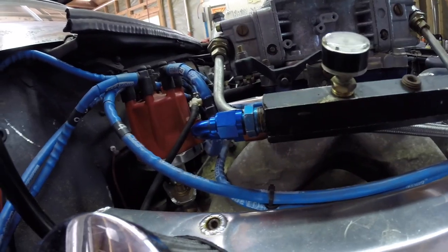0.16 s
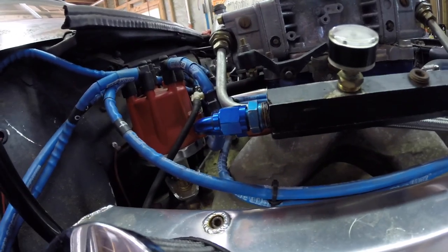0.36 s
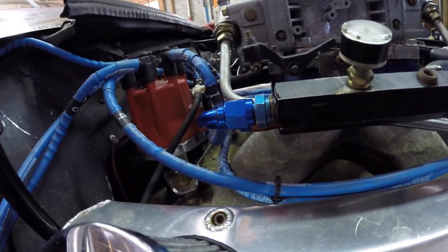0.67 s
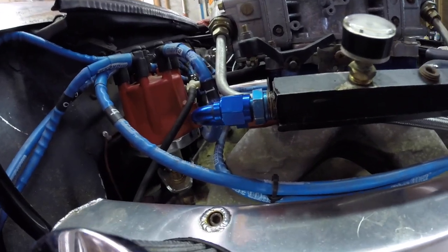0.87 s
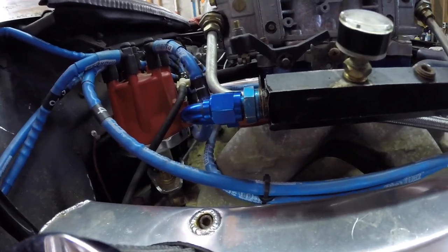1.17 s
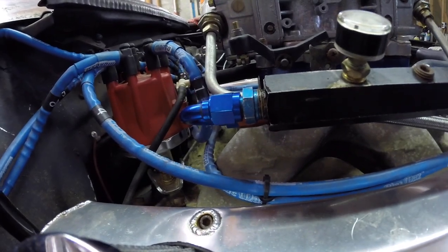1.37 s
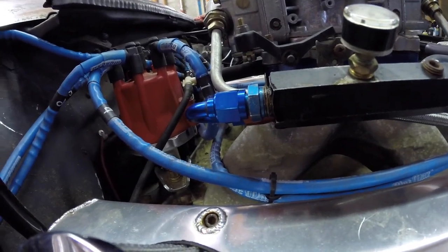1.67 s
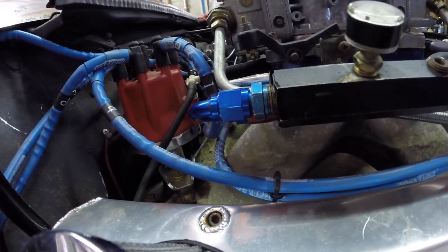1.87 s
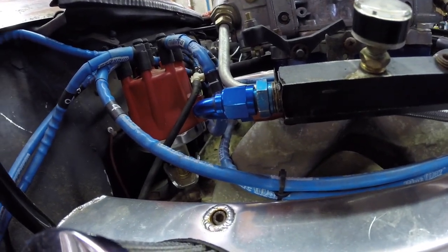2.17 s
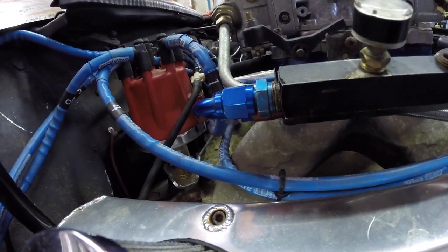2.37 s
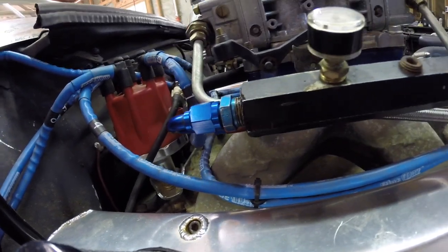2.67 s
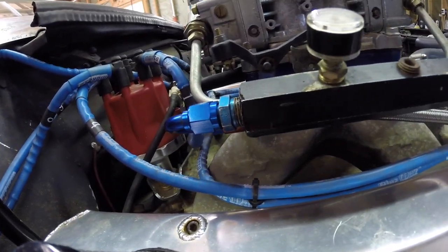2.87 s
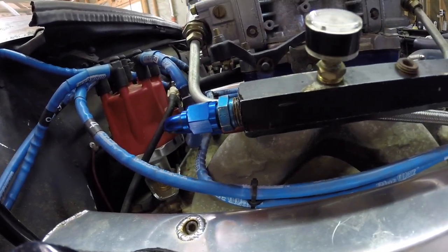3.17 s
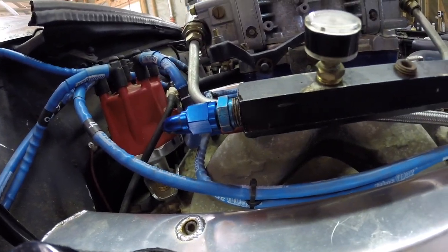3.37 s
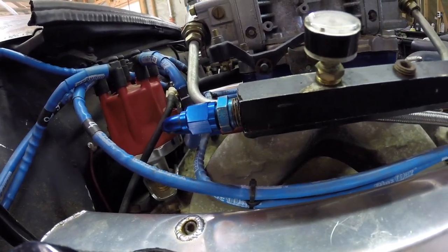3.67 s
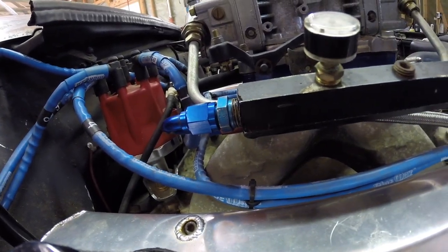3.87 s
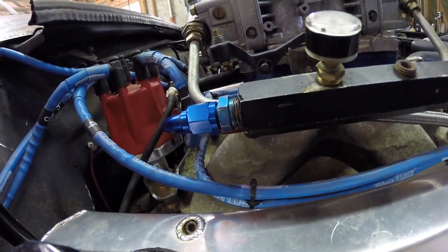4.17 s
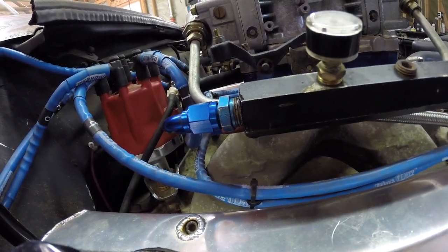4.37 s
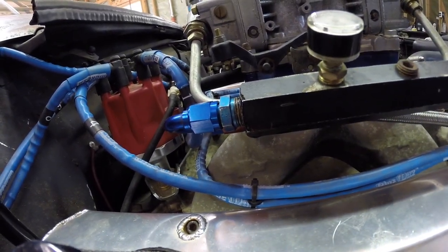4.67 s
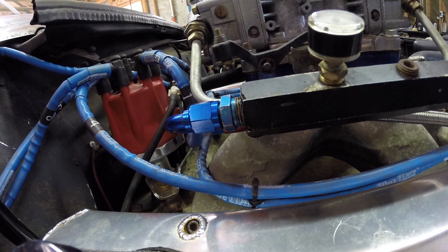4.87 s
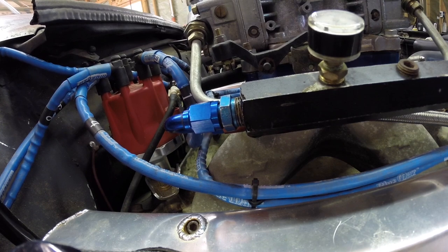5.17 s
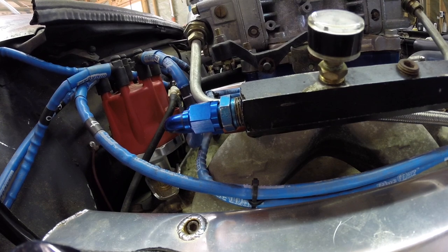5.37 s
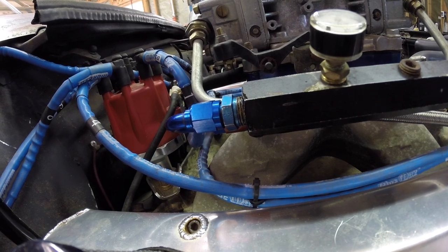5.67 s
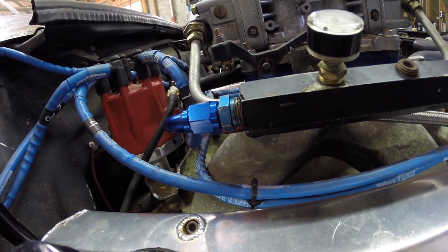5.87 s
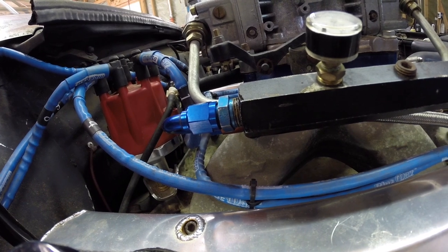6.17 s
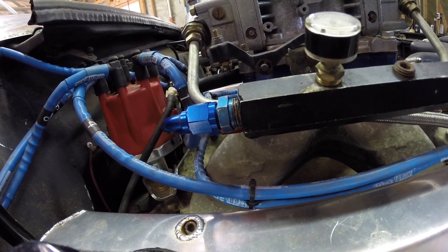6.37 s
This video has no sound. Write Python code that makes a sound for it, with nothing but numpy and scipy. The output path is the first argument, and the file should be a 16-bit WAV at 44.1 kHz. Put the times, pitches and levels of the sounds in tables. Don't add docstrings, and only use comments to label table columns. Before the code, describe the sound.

An electric fuel pump runs without a break, close to a hand-held microphone in a garage. Its steady, raspy mid-low buzz carries a thin high whine, very fast light metallic ticking and a fizzing hiss of fuel. The sound is slightly brighter at the start as the microphone leans in, then settles, its tint shifting around 2.5 seconds. A distant machine and fan drone faintly underneath.

```python
import sys
import numpy as np
from scipy import signal
from scipy.fft import rfft, irfft
from scipy.io import wavfile
from scipy.ndimage import uniform_filter1d, map_coordinates

SR = 44100
rng = np.random.default_rng(int(sys.argv[2]) if len(sys.argv) > 2 else 0)


def dump(signal):
    limited = np.clip(np.atleast_2d(signal).T, -1, 1)
    pcm = np.round(limited * 32767).astype(np.int16)
    wavfile.write(sys.argv[1], SR, pcm)


def gain_from_db(level_db):
    decades = np.asarray(level_db, float) / 20
    return 10 ** decades


N = 287532
STEP = 2048

# (time [s], speed above base [rpm])
PUMP_SPEED = [
    (0, 5.9),
    (.8, 6.1),
    (1.1, 4.2),
    (2.55, 3.9),
    (3.1, 9.2),
    (3.65, 3.6),
    (4.0, 7.9),
    (5.3, 6.8),
    (6.52, 8.5),
]
BASE_RPM = 2450
# (time [s], way from first to second place [0-1], leaning in [0-1])
CAMERA_PATH = [
    (0, 0, 1),
    (.25, 0, 1),
    (1.1, 0, 0),
    (2.45, 0, 0),
    (2.8, 1, 0),
    (6.52, 1, 0),
]

# (shaft order [per turn], level [dB])
HOSE_ORDERS = [(3, -54.5), (4, -42), (5, -55), (6, -60), (7, -42), (8, -42), (9, -49.5), (10, -51.5),
               (11, -45), (12, -47), (13, -60.5), (14, -66.5), (15, -51.5)]
# (shaft order [per turn], level at first place [dB], level at second place [dB])
PANEL_ORDERS = [(16, -63, -62), (17, -60, -61), (18, -60, -62), (19, -66, -63), (20, -59, -58),
                (21, -67, -62), (22, -59, -58), (23, -55, -55), (24, -53, -51), (25, -63, -66),
                (26, -60, -59), (27, -80, -68), (28, -54, -55), (29, -50, -51), (30, -60, -59),
                (31, -55, -57), (32, -47, -49), (34, -54, -53), (35, -58, -59), (36, -60, -59),
                (37, -64, -64), (38, -66, -66), (39, -66, -63), (40, -67, -68)]
# (shaft order [per turn], level at first place [dB], level at second place [dB])
WHINE_ORDERS = [(50, -67, -65), (51, -71, -68), (54, -65, -64), (56, -67, -66), (62, -65, -64),
                (65, -68, -65), (66, -72, -69), (73, -68, -71), (75, -75, -63), (78, -62, -65),
                (80, -69, -73), (81, -64, -71), (82, -68, -68), (85, -66, -64), (94, -69, -73),
                (95, -65, -64), (96, -64, -64), (102, -69, -70), (103, -66, -67), (109, -65, -63),
                (111, -64, -66), (113, -65, -65), (120, -71, -68), (122, -69, -71), (124, -67, -67),
                (137, -68, -80), (141, -73, -83), (168, -78, -70), (170, -83, -74), (198, -74, -74)]
# (frequency [Hz], level [dB])
WEAK_ORDERS = [(1600, -70.5), (3000, -74), (4500, -72), (5500, -76.5), (7000, -79.5), (9000, -86)]
# (frequency [Hz], half width [Hz])
BODY = [(214.5, 13), (268, -6), (364, 6), (455, -91), (507, 74), (547.5, 6), (793, 110), (934, -13.5),
        (967, 14), (981, 7), (1108, 12), (1282, 45), (1291, 7), (1393, 6)]
BUZZ_DB, WHINE_DB = .22, 1.2
PULSE_LAG, PULSE_SLOPE = .359, .285
LOBES, LOBE_SCATTER = 4, .6

# (place in turn [0-1], level [dB], scatter [dB], ring [Hz], ring width [Hz])
TAPS = [
    (0, -47, 1.2, 9620, 570),
    (.756, -49.5, 3.5, 9700, 630),
    (0.99, -62.5, 6, 9500, 550),
    (1, -59, 6, 10200, 500),
    (.06, -56, 3.5, 8090, 230),
    (.8, -56, 3, 8090, 370),
    (.755, -66, 4, 9500, 300),
    (0, -59.5, 2, 11700, 430),
    (.77, -63, 4, 13600, 400),
]
# (frequency [Hz], width [Hz], level at first place [dB], level at second place [dB])
RINGS = [(3330, 270, -62, -61.5), (3860, 220, -65.5, -64), (4506, 560, -59.5, -61.5), (5140, 52, -73, -70),
         (6300, 74, -66, -67), (7260, 100, -70, -76), (8720, 170, -71.5, -69), (10200, 240, -68, -80),
         (10760, 170, -70, -76), (11730, 360, -75, -73), (12200, 150, -81, -81), (14850, 350, -75, -76)]
# (frequency [Hz], width [Hz], level leaning in [dB], at first place [dB], at second place [dB])
MOVING_RINGS = [(5690, 460, -51, -59, -62), (6860, 160, -66, -65, -59.5), (8110, 120, -63, -59.5, -64.5),
                (9640, 430, -62.5, -64, -63.5), (13600, 300, -64, -68, -69)]
RING_SWAY_DB, RING_SWAY_HZ = .8, 1.2
# (frequency [Hz], density [dB per Hz])
HISS = [(15, -43), (25, -12), (91, -15.5), (159, -10.5), (232, -13), (312, -8.5), (479, -9.5), (548, -17.5),
        (610, -9.5), (756, -18.5), (1330, -16.5), (1690, -21), (8710, -28), (9690, -29.5), (15300, -39)]
HISS_DB = -47
# (frequency [Hz], width [Hz], depth [0-1])
GAPS = [(228, 32, 0.04), (352, 41, 0.24), (750, 44, 0), (1400, 38, 0.6), (2410, 210, 0.7), (3560, 160, 0.4),
        (5200, 160, 0.46), (5900, 80, 0.3), (7740, 150, 0.6), (8400, 180, 0.6), (9080, 170, .6),
        (11250, 200, 0.3), (12700, 500, 0.4), (14500, 300, .2)]

# (shaft order [per turn], level [dB])
DRONE_ORDERS = [(2, -55), (5, -58.5), (6, -61), (7, -65.5), (8, -70), (10, -72.5)]
HUNT_HZ, HUNT_DEPTH_HZ, HUNT_PERIOD_S, HUNT_TOP_S = 27.9, .42, 5.0, .9
THIRD_DB, THIRD_FADE_DB_PER_S = -55.5, -1.3
STANDING_HZ, STANDING_WIDTH_HZ, STANDING_DB = 82.4, .45, 8.0
# (shaft order [per turn], level [dB])
FAN_ORDERS = [(5, -66.5), (9, -70), (14, -63), (20, -66.5)]
BELT_RATIO, SLIP_HZ, SLIP_PERIOD_S, SLIP_TOP_S = .48, .11, 1.9, 1.05
FAN_BLADES, BLADE_DB = 10, -54.5
BEAT_DB, BEAT_PERIOD_S, BEAT_TOP_S = 3.5, 1.18, 1.33


def curve(rows):
    s, *columns = np.transpose(rows)
    return [np.interp(np.arange(N) / SR, s, column) for column in columns]


def read(points, hz):
    f, value = np.transpose(points)
    return np.interp(np.log(hz + 1), np.log(f + 1), value)


def evened(x):
    return x / np.sqrt(np.mean(x ** 2) + 1e-20)


def between(first, second, place):
    return np.outer(first, 1 - place) + np.outer(second, place)


def drift(count, hz):
    size = N // STEP + 2
    z = rfft(rng.standard_normal((count, size)), axis=1)
    f = np.arange(z.shape[1]) * SR / N
    return evened(irfft(z / (1 + (f / hz) ** 2), size, axis=1))


def smooth(row):
    return np.interp(np.arange(N) / STEP, np.arange(len(row)), row)


def swing(period_s, top_s):
    return np.cos(2 * np.pi * (np.arange(N) / SR - top_s) / period_s)


def pant(turns, depth, crest):
    return 1 + depth * np.cos(2 * np.pi * (turns - crest))


def tones(turns, orders, level_db, lag, waver_db, waver_hz):
    swell = gain_from_db(level_db + waver_db * drift(len(orders), waver_hz))
    z = np.zeros((4097, swell.shape[1]), complex)
    z[np.round(orders).astype(int)] = swell * np.exp(2j * np.pi * lag)[:, None]
    waves = irfft(z, axis=0) * 4096 * np.sqrt(2)
    waves = np.vstack([waves, waves[:1]])
    return map_coordinates(waves, [turns % 1 * 8192, np.arange(N) / STEP], order=1)


def bay(x, place, t60, wet_db):
    t = np.arange(4096) / SR
    tails = rng.standard_normal((3, 4096)) * gain_from_db(-60 * t / t60) * (t > .001)
    tails *= gain_from_db(wet_db) / np.linalg.norm(tails, axis=1, keepdims=True)
    first, second, drifting = signal.fftconvolve(x[None], tails, axes=1)[:, :N]
    sway = .5 * smooth(drift(count=1, hz=.26)[0])
    steady = np.cos(place * np.pi / 2) * first + np.sin(place * np.pi / 2) * second
    return x + np.cos(sway) * steady + np.sin(sway) * drifting


def buzz(turns, place):
    place = np.interp(np.arange(N // STEP + 2) * STEP, np.arange(N), place)
    hoses = [(order, db, db) for order, db in HOSE_ORDERS]
    k, first_db, second_db = np.transpose(hoses + PANEL_ORDERS)
    k = np.round(k)
    body_lag = sum(np.arctan((k * 40.94 - hz) / w) for hz, w in BODY) / (2 * np.pi)
    lag = PULSE_LAG + PULSE_SLOPE * k - body_lag
    low_db = BUZZ_DB + between(first_db, second_db, place)
    low = tones(turns, k, low_db, lag, waver_db=.3, waver_hz=.7)

    k = np.arange(41, 220)
    scatter_db = 10 * np.log10(np.clip(rng.exponential(1, (len(k), 2)), .05, 2.5))
    level_db = read(WEAK_ORDERS, k * BASE_RPM / 60)[:, None] + scatter_db
    for order, *db in WHINE_ORDERS:
        level_db[round(order) - 41] = WHINE_DB + np.array(db)
    lag = k ** 2 / (2 * LOBES) + LOBE_SCATTER * rng.random(len(k))
    whine = tones(turns, k, between(*level_db.T, place), lag, waver_db=1.1, waver_hz=.8)
    return low + whine


def ring_levels(place, lean):
    lean_db, first_db, second_db = np.transpose(MOVING_RINGS)[2:]
    sway = np.array([smooth(row) for row in drift(len(lean_db), RING_SWAY_HZ)])
    leaning = np.outer(lean_db - first_db, lean)
    return between(first_db, second_db, place) + leaning + RING_SWAY_DB * sway


def tap_colour(hz, moving_db):
    nearest = moving_db[np.argmin([abs(hz - row[0]) for row in MOVING_RINGS])]
    return gain_from_db(nearest - nearest.mean())


def taps(turns, moving_db):
    out = np.zeros(N)
    whole = np.arange(int(turns[-1]) - 1)
    t = np.arange(1024) / SR
    for angle, db, scatter_db, hz, width in TAPS:
        chance = rng.standard_normal((len(whole), 2))
        angles = np.clip(angle + .002 * chance[:, 0], 0, None)
        at = np.searchsorted(turns, whole + angles)
        clicks = np.zeros(N)
        clicks[at] = gain_from_db(scatter_db * chance[:, 1])
        puff = t * width * np.e * np.pi * np.exp(-np.pi * width * t)
        ring = puff * np.sin(2 * np.pi * hz * t)
        out += gain_from_db(db) * signal.oaconvolve(clicks, ring)[:N] * tap_colour(hz, moving_db)
    return out


def resonate(x, hz, width):
    edges = [hz - width / 2, hz + width / 2]
    return evened(signal.sosfilt(signal.butter(2, edges, "band", fs=SR, output="sos"), x))


def rings(turns, moving_db, place):
    lumps = gain_from_db(.92 * evened(uniform_filter1d(rng.standard_normal(N), 120)))
    flow = rng.standard_normal(N) * lumps * pant(turns, .45, crest=.95)
    out = np.zeros(N)
    for hz, width, first_db, second_db in RINGS:
        out += gain_from_db(between(first_db, second_db, place)[0]) * resonate(flow, hz, width)
    for (hz, width, *_), db in zip(MOVING_RINGS, moving_db):
        out += gain_from_db(db - 4.5) * resonate(flow, hz, width)
    return out


def hiss(turns, place):
    frames, hz = N // 512 + 5, np.fft.rfftfreq(2048, 1 / SR)
    a, b, patches = rng.standard_normal((frames, 1025, 3)).T
    patches = evened(uniform_filter1d(uniform_filter1d(patches, 16, 0), 6, 1))
    z = (a + 1j * b) * gain_from_db(read(HISS, hz)[:, None] + .67 * patches)
    noise = signal.istft(z, nperseg=2048, noverlap=1536)[1][:N]
    air = gain_from_db(HISS_DB) * evened(noise)
    top = signal.sosfiltfilt(signal.butter(2, 2000, "high", fs=SR, output="sos"), air)
    low = (air - top) * pant(turns, .1, crest=.7)
    top = top * pant(turns, .13, crest=.93)
    return low + bay(top, place, t60=.12, wet_db=-3) * gain_from_db(-1.8)


def cancel(x):
    for hz, width, depth in GAPS:
        x = x - np.clip(depth, 0, 1) * signal.lfilter(*signal.iirpeak(hz, hz / width, SR), x)
    return x


def distant(hz, table, order, level_db):
    k, table_db = np.transpose(table)
    turns = np.cumsum(hz) / SR
    rest = tones(turns, k, table_db[:, None], rng.random(len(k)), waver_db=2.0, waver_hz=2.7)
    return rest + np.sqrt(2) * gain_from_db(level_db) * np.sin(2 * np.pi * order * turns)


def garage():
    hz = HUNT_HZ + HUNT_DEPTH_HZ * swing(HUNT_PERIOD_S, HUNT_TOP_S)
    standing = np.exp(-((3 * hz - STANDING_HZ) / STANDING_WIDTH_HZ) ** 2)
    third_db = THIRD_DB + THIRD_FADE_DB_PER_S * np.arange(N) / SR + STANDING_DB * standing
    machine = distant(hz, DRONE_ORDERS, order=3, level_db=third_db)
    fan_hz = BELT_RATIO * hz + SLIP_HZ * swing(SLIP_PERIOD_S, SLIP_TOP_S)
    blade_db = BLADE_DB + BEAT_DB * swing(BEAT_PERIOD_S, BEAT_TOP_S)
    return machine + distant(fan_hz, FAN_ORDERS, order=FAN_BLADES, level_db=blade_db)


def scene():
    turns = np.cumsum(BASE_RPM + curve(PUMP_SPEED)[0]) / 60 / SR
    place, lean = curve(CAMERA_PATH)
    moving_db = ring_levels(place, lean)
    pump = buzz(turns, place)
    knocks = bay(taps(turns, moving_db), place, t60=.12, wet_db=-6)
    flow = bay(rings(turns, moving_db, place), place, t60=.12, wet_db=-2) * gain_from_db(-2)
    noise = cancel(knocks + flow + hiss(turns, place))
    return (pump + noise + garage())[None]


def band_limit(x):
    return signal.sosfilt(signal.butter(12, 15640, fs=SR, output="sos"), x)


def record(dry):
    edge = signal.firwin(1023, 15270, window=("kaiser", 9), fs=SR)
    mix = signal.oaconvolve(dry, edge[None], "same")
    return band_limit(mix)


dry = scene()
out = record(dry)
dump(out)
```